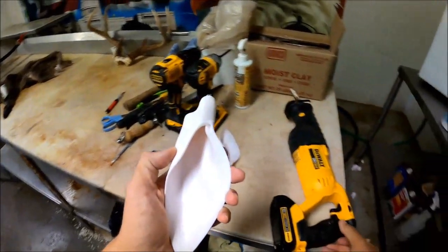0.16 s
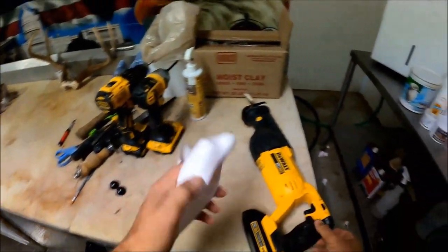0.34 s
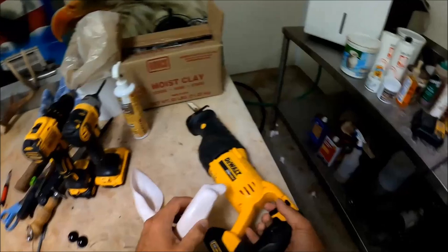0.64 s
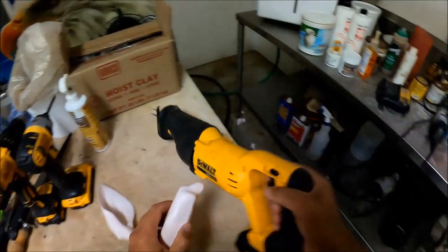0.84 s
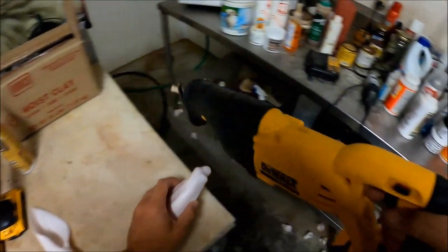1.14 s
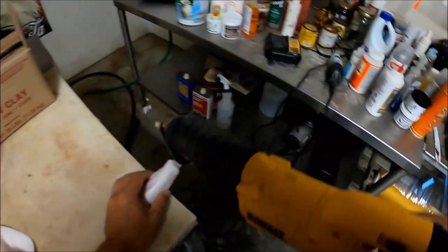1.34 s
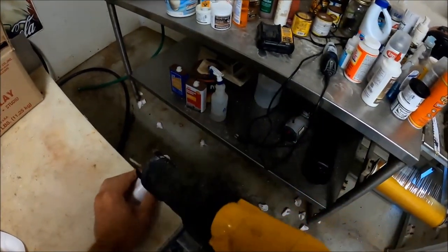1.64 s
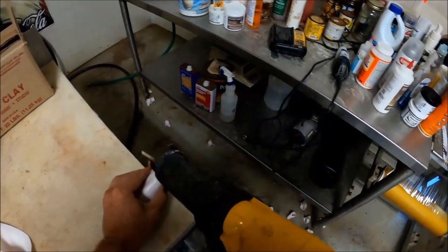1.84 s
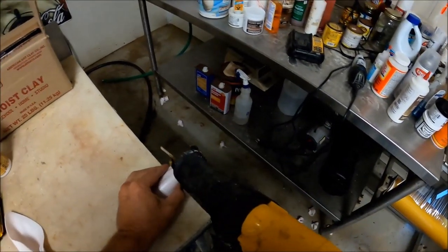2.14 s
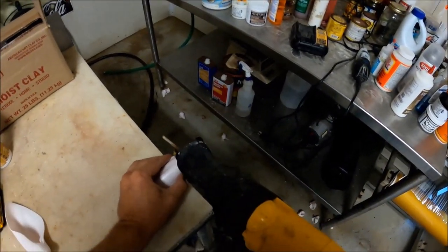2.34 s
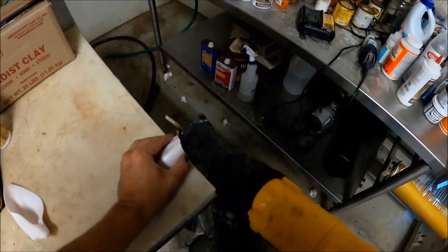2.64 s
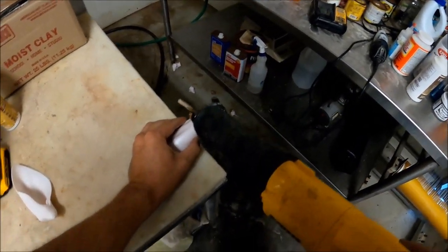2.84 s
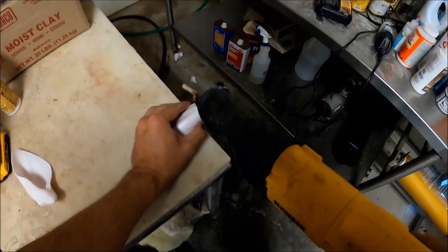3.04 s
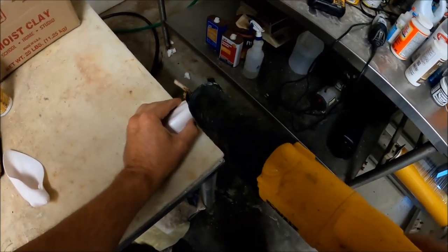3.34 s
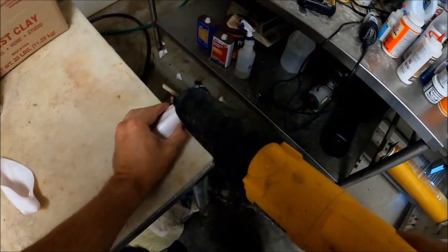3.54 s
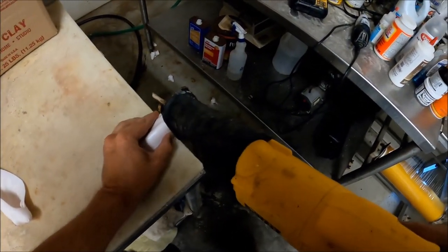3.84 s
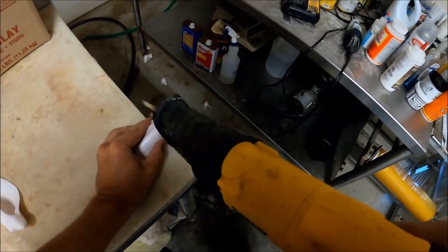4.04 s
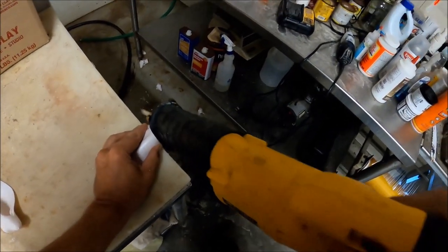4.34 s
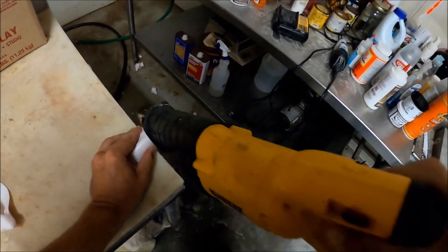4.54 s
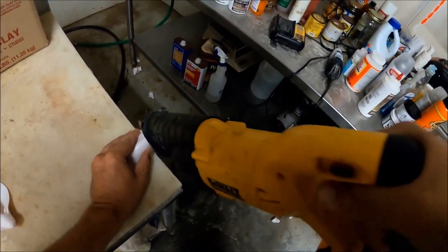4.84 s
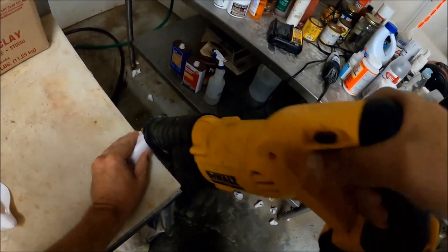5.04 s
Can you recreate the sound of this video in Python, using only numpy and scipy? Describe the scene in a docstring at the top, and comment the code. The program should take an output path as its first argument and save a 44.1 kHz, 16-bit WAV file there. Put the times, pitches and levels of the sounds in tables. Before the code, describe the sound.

In a small, quiet workshop, a cordless reciprocating saw is dragged off a bench with light scrapes, dull thuds and plastic clacks. It knocks a couple of times against a hollow plastic piece, followed by a lull with faint ticks. Then the trigger clicks and the saw runs steadily, rattling and rasping as it cuts the plastic. Heard close, from just above the tool.

```python
"""A small workshop, heard from just above a cordless reciprocating saw. The saw is dragged off the bench,
bumping the top, and its shoe is set against a plastic piece: friction hisses and impacts excite modes.
The trigger clicks and the crank runs up to about 41 strokes a second. The slide knocks several times in
each stroke, at the same crank angles; gear teeth rattle and the blade rasps, all filtered by the
resonances of the gear case, while the moving mass forces tool and bench into low vibration."""
import sys
import numpy as np
from scipy import signal
from scipy.fft import rfft, irfft
from scipy.io import wavfile
from scipy.ndimage import uniform_filter1d

SR = 44100
rng = np.random.default_rng(int(sys.argv[2]) if len(sys.argv) > 2 else 0)


def generate_wav(sig):
    """Save sig (samples, or channels by samples) to the path in sys.argv[1] as 16-bit PCM at SR."""
    pcm = np.round(np.clip(np.atleast_2d(sig).T, -1, 1) * 32767).astype(np.int16)
    wavfile.write(sys.argv[1], SR, pcm)


N = 228658
TIME = np.arange(N) / SR
HIT_SIZE = SR // 8
MOTOR_ON_S = 4.097


def saw(gear_db=-29.5, blade_db=-32, split_hz=2700):
    """Source and filter: the running saw, with gears below and blade above wavering under the load."""
    running_s = np.maximum(TIME - MOTOR_ON_S, 0)
    stroke_hz, turn = crank(running_s)
    catch = np.exp(-running_s / 0.11)  # louder while the teeth first catch
    loose = np.exp(-running_s / 0.21)  # the blade rings until the cut guides it
    gear_gain = undb(gear_db + 2.5 * catch + 0.27 * walk(18))
    blade_gain = undb(blade_db + 2 * loose + 0.5 * walk(20))
    body = gear_case(turn)
    depth = np.clip(running_s, 0, 1)  # the plastic resonates more as the cut deepens
    body = body + depth * undb(-3) * resonate(body, 3890, 340) + biting(body)
    body = body + loose * undb(0.5) * resonate(body, 4900, 860)
    gears = unit(cut(body, split_hz, "low"))
    blade = -unit(cut(body, split_hz, "high"))
    running = gears * gear_gain + blade * blade_gain + shaking(turn, stroke_hz)
    return running * np.clip(running_s / 0.006, 0, 1)


def crank(running_s, start_hz=29.18, cutting_hz=40.8, sag_hz=2.85, start_turns=.68):
    """Rotation under load: stroke rate [Hz] and angle [turns] of a crank that slows as the blade binds."""
    run_up = start_hz + 70 * running_s
    creep = cutting_hz + 1.15 * running_s
    binding = np.exp(-((TIME - 4.68) / .17) ** 2)
    stroke_hz = np.minimum(run_up, creep) - sag_hz * binding
    turn = np.cumsum(stroke_hz) / SR
    return stroke_hz, turn + (start_turns - np.interp(MOTOR_ON_S, TIME, turn)) % 1


# resonances of the gear case: (frequency [Hz], bandwidth [Hz], gain [dB])
CASE_RESONANCES = [(908, 63, -1.5), (1110, 26, -24), (1236, 120, -8), (1507, 230, -4), (1790, 40, -4),
                   (2060, 150, -5), (2530, 54, -4), (5140, 500, -3.5), (5900, 440, -0.5),
                   (12700, 1800, 2.5)]
# spectral envelope of the running saw: (frequency [Hz], gain [dB])
SAW_SPECTRUM = [(150, 1), (300, -2.5), (460, 1.5), (640, -3), (920, -3.5), (1250, -2.5), (1700, -6),
                (2750, -10.5), (3820, -8), (5000, -13), (6200, -19.5), (6900, -17), (8750, -22.5),
                (12400, -30), (15000, -50)]


def gear_case(turn, knock_db=-5.5, teeth_db=-4, rasp_db=-1.5, flicker_db=2.5):
    """Radiation from a small body: knocks, teeth and rasp excite a case too small to radiate bass."""
    rasp = undb(rasp_db) * blade_rasp(turn)
    knocks = undb(knock_db) * slide_knocks(turn)
    teeth = undb(teeth_db) * unit(two_paths(gear_teeth(turn)))
    force = knocks + teeth + rasp
    # the resonances come and go as the pressure of hand and shoe shifts
    ringing = sum(undb(db + flicker_db * walk(22)) * resonate(force, hz, width)
                  for hz, width, db in CASE_RESONANCES)
    radiated = np.array([colour(side, SAW_SPECTRUM) for side in force + ringing])
    return cut(radiated, 230, "high")


def blade_rasp(turn):
    """Sliding friction: the rasp is strongest at mid-stroke, where the blade moves fastest."""
    speed_db = 0.31 * np.cos(4 * np.pi * (turn - .2))
    return unit(diffuse(lambda: grit(2.5), apart_hz=5300) * undb(speed_db))


# knocks of the slide in each turn: (crank angle [turns], relative level [dB], brightness [Hz])
SLIDE_IMPACTS = [(.149, -2.5, 4060), (0.272, -4, 1400), (.62, -4.5, 4800), (.76, -7.5, 1600),
                 (.929, -3, 1260)]


def slide_knocks(turn, jitter_turns=.004, wander_turns=.02, scatter_db=0.97, chatter=0.7):
    """Backlash: the slide takes up its play at the same angles on each turn, and chatters briefly."""
    out = 0
    strokes = np.arange(int(turn[-1]))
    for angle, db, hz in SLIDE_IMPACTS:
        late, size = rng.standard_normal((len(strokes), 2)).T
        angles = strokes + angle + jitter_turns * late
        hits = impulses(angles, turn + wander_turns * walk(4), scatter_db * size)
        rattle = through(hits, fade(0.076)) * rng.standard_normal(N)
        blow = unit(through(hits, burst(0.005)) + chatter * np.std(hits) * unit(rattle))
        blow = unit(resonate(resonate(blow, hz, hz), hz, hz))
        out = out + two_paths(blow) * undb(db) * np.sqrt(hz)  # brighter knocks weigh more
    return unit(out)


def gear_teeth(turn, count=30, jitter=.12):
    """Gear meshing: each tooth clicks; uneven wear repeats every turn, so the whine follows the crank."""
    tooth = np.arange(int(turn[-1] * count))
    wear = rng.standard_normal(count)[tooth % count]
    late, size = rng.standard_normal((len(tooth), 2)).T
    clicks = impulses((tooth + jitter * late) / count, turn, 4 * wear + 1.2 * size)
    return unit(cut(clicks, 150, "high"))


# bites into the plastic: (time [s], half duration [s], gain [dB], frequency [Hz])
TOOTH_BITES = [(4.13, 0.026, -4, 1350), (4.192, .03, -10, 1830), (4.36, .025, -12, 1400),
               (4.502, 0.027, 2, 2000), (4.775, 0.03, -1.5, 1270), (4.925, 0.023, -2, 1190),
               (5.105, 0.02, -9, 1380)]


def biting(body, width_hz=330):
    """Transient resonance: each time the teeth bite deeper, the plastic barks at a pitch of its own."""
    return sum(undb(db) * np.exp(-((TIME - s) / length) ** 2) * resonate(body, hz, width_hz)
               for s, length, db, hz in TOOTH_BITES)


# bouncing of the shoe, near full speed and as the blade binds: (time [s], relative level [dB])
SHOE_BOUNCE = [(4.17, -40), (4.205, -27), (4.3, -31.5), (4.4, -34), (4.6, -41), (4.75, -38), (4.87, -43),
               (5.18, -44)]
# vibration of tool and bench: (harmonic of the stroke rate, relative level [dB])
STROKE_HARMONICS = [(1, -6), (2, -1.5), (3, -3.5), (4, -1.5), (6, -2), (7, -3), (8, 3.5), (11, -2.5),
                    (12, -4), (14, -3)]
# bench resonances swept by the fifth harmonic: (frequency [Hz], bandwidth [Hz], level [dB])
BENCH_DRONES = [(164.5, 30, -32), (204.6, 14, -34.5)]


def shaking(turn, stroke_hz, rumble_db=-13, chug_db=-12):
    """Forced vibration: the moving mass shakes tool and bench; its fifth harmonic drones at resonance."""
    bounce_db = np.interp(TIME, *np.transpose(SHOE_BOUNCE))
    heave = 0
    for k, db in STROKE_HARMONICS:
        # the lowest harmonics follow the bouncing shoe; the upper ones stay steadier
        level_db = db + walk(14) + (bounce_db - 5 if k <= 3 else -46)
        drift = .18 * walk(14)
        heave = heave + undb(level_db) * np.sin(2 * np.pi * (k * turn + rng.random()) + drift)
    rumble = cut(rng.standard_normal(N), 203, "low", order=4)
    rumble = unit(cut(rumble, 64, "high"))
    resonance = sum(undb(db) / (1 + (2 * (5 * stroke_hz - hz) / width) ** 2) ** 2
                    for hz, width, db in BENCH_DRONES)
    drone = resonance * np.sin(2 * np.pi * 5 * turn + .2 * walk(30))
    bounce = undb(rumble_db) * rumble + undb(chug_db) * chugging(turn)
    return heave + bounce * undb(bounce_db) + drone * undb(0.83 * walk(33))


def chugging(turn, scatter_db=4, jitter_turns=0.03):
    """Periodic impact: the shoe drops once a stroke, never equally hard, and thumps the bench top."""
    strokes = np.arange(int(turn[-1]))
    late, size = rng.standard_normal((len(strokes), 2)).T
    drops = impulses(strokes + jitter_turns * late, turn, scatter_db * size)
    thumps = through(drops, bench_top(scatter_db=1, detune=.01))
    return unit(cut(thumps, 260, "low"))


# modes of the bench top: (frequency [Hz], T60 [s], relative level [dB])
BENCH_MODES = [(111.6, 0.21, -13.5), (152.7, 0.13, -6), (195, 0.12, -4), (224.5, 0.11, -5),
               (273, 0.072, -4), (366.6, 0.045, -5), (465, 0.041, -8.5), (602, 0.018, 0), (933, 0.03, -3.5)]


def bench_top(scatter_db, detune):
    """Plate vibration: the bench top answers a blow with its damped modes."""
    return ring(BENCH_MODES, scatter_db, detune)


# modes of shoe and plastic housing: (frequency [Hz], T60 [s], relative level [dB])
HOUSING_MODES = [(515, 0.023, -9.5), (836, 0.0076, -12.5), (1064, 0.03, -2), (1335, 0.022, 4.5),
                 (1583, 0.03, -1.5), (1950, 0.0034, 3), (2290, 0.012, -6), (4080, 0.016, -14)]
# spectral envelope of a hard tick: (frequency [Hz], gain [dB])
TICK_SPECTRUM = [(300, -15), (1400, 1.5), (2300, 7), (3300, 4), (4800, 2), (6500, -5.5), (10000, -11),
                 (14000, -22.5)]
# contacts of shoe, housing and trigger:
# (time [s], relative body level [dB], relative tick level [dB], rebound delay [s])
TOOL_CONTACTS = [(0.287, -49, -70, 0.00317), (.661, -45.5, -50, 0.017), (.719, -29, -25, 0.0062),
                 (.796, -26, -35, 0.016), (.814, -30, -35, .007), (.854, -41, -39, 0.0054),
                 (.878, -28, -28.5, 0.0043), (.901, -26, -37.5, 0.012), (1.0, -33.5, -45, 0.0073),
                 (1.234, -45.5, -51, 0.0037), (1.405, -29.5, -43.5, 0.0023), (1.408, -19.5, -39, 0.0022),
                 (1.594, -42.5, -49.5, 0.0032), (1.784, -27.5, -38, 0.018), (1.81, -22.5, -30, .004),
                 (1.84, -33.5, -47, .012), (1.998, -36, -53, .003), (2.192, -51.5, -64, 0.015),
                 (2.664, -61.5, -68, .004), (2.813, -57, -66, 0.022), (3.221, -55, -54.5, .005),
                 (3.306, -52.5, -72, .003), (3.633, -54, -66, 0.008), (3.714, -56, -68, 0.0036),
                 (3.741, -54, -57.5, 0.0034), (3.767, -37, -54, 0.0056), (3.781, -37, -44, 0.0039),
                 (4.008, -34, -48, 0.015), (4.037, -46.5, -47.5, .004), (4.066, -43, -58, 0.0046),
                 (4.075, -17.5, -24, 0.0043), (4.11, -27, -39, .005)]


def clacks(crunch_gain=0.7, hollow_db=-13):
    """Impact excitation: each contact and its rebound ring the housing, crunch briefly and tick."""
    out = np.zeros((2, N))
    onset = np.clip(TIME[:HIT_SIZE] / 0.0015, 0, 1)  # the plastic gives way
    for s, body_db, tick_db, gap_s in TOOL_CONTACTS:
        edge_hz = 12000 * 2 ** ((tick_db - body_db) / 22)  # a softer contact has a duller tick
        for at, loss_db in rebounds(s, gap_s, loss_db=-5.5):
            modes = unit(ring(HOUSING_MODES, 2, .04))
            hollow = unit(resonate(burst(0.2), 416, 230))
            crunch = unit(resonate(burst(0.037), 1330, 680))
            body = modes + crunch_gain * crunch + undb(hollow_db) * hollow
            body = cut(body * onset, 2600, "low", order=3)
            body = unit(cut(body, 213, "high", order=3))
            tick = colour(burst(0.024) * onset, TICK_SPECTRUM)
            tick = unit(cut(tick, edge_hz, "low"))
            clack = undb(body_db - 18.5) * body + undb(tick_db - 15.5) * tick
            add(out, at, two_paths(undb(loss_db) * clack))
    return out


# blows of the saw on the bench: (time [s], relative level [dB], upper cutoff [Hz], lower cutoff [Hz])
BENCH_BLOWS = [(0.671, -40, 250, 60), (0.719, -14.5, 390, 60), (.779, -20, 1200, 300),
               (.789, -15.5, 523, 90), (0.877, -23, 490, 60), (.9, -24, 420, 60), (2.006, -52.5, 300, 80),
               (2.628, -57, 220, 120), (3.402, -54, 400, 99), (3.78, -45.5, 800, 200)]


def bumps(thud_db=15, softening=0.71, hard_db=-24.5):
    """Inelastic collision: the saw thuds on the bench and rebounds softly; hard clacks jolt it too."""
    out = np.zeros(N)
    blows = [(at, db + loss_db, hz * softening ** k, low_hz) for s, db, hz, low_hz in BENCH_BLOWS
             for k, (at, loss_db) in enumerate(rebounds(s, gap_s=0.036, loss_db=-8))]
    jolts = [(s, body_db - 20, 706, 100) for s, body_db, _, _ in TOOL_CONTACTS if body_db > hard_db]
    for s, db, high_hz, low_hz in blows + jolts:
        thud = bench_top(scatter_db=2.5, detune=.03) + undb(thud_db) * burst(0.09)
        thud = cut(cut(thud, high_hz, "low"), low_hz, "high")
        add(out, s, undb(db + 3) * thud / np.abs(thud).max())
    return out


# pings of the blade: (time [s], relative level [dB], frequency [Hz], tone-to-jingle ratio [dB])
BLADE_PINGS = [(0.722, -39, 5750, -2), (.909, -35, 5740, -3), (1.0, -53, 5760, -3), (1.812, -26, 3950, -19)]


def pings(t60=0.24, width_hz=650, beat_hz=50):
    """Beating: the loose blade jingles in its clamp and rings on in two closely spaced modes."""
    out = np.zeros((2, N))
    for s, db, hz, tone_db in BLADE_PINGS:
        jingle = resonate(resonate(burst(0.059), hz, width_hz), hz, width_hz)
        tone = ring([(hz, t60, 0), (hz + beat_hz, t60, -4)], 1, .001)
        ping = unit(unit(jingle) + undb(tone_db) * unit(tone))
        add(out, s, two_paths(undb(db - 20.5) * ping))
    return out


# modes of the plastic piece: (frequency [Hz], T60 [s], relative level [dB])
PIECE_MODES = [(520, 0.31, -12), (958, 0.23, -9.5), (1145, 0.1, 4.5), (1243, 0.053, -2.5), (1600, .12, -14)]


def piece_knock(at_s=1.409, level_db=-44):
    """Free vibration: the hollow plastic piece rings when the saw first knocks against it."""
    out = np.zeros((2, N))
    add(out, at_s, two_paths(undb(level_db) * unit(ring(PIECE_MODES, 1, 0.0046))))
    return out


# spectral envelope of sliding plastic: (frequency [Hz], gain [dB])
FRICTION_SPECTRUM = [(88, -17), (150, -6.5), (228, 0), (270, -12), (380, -5), (893, -9), (1770, -4.5),
                     (2590, -10.5), (4320, -12.5), (6300, -23.5), (9000, -29), (14000, -46)]
# scrapes: (time of peak pressure [s], relative level [dB], swell time [s], decay time [s])
SCRAPE_SWELLS = [(.23, -59.5, 0.06, 0.34), (0.401, -45, 0.048, 0.067), (.62, -61.5, 0.14, .08),
                 (0.721, -50.5, 0.054, 0.15), (.87, -45.5, 0.1, 0.065), (1.15, -61.5, 0.055, 0.043),
                 (1.399, -47, 0.022, 0.04), (1.805, -40, 0.016, 0.064), (2.85, -72, .03, 0.062),
                 (3.77, -55, 0.027, 0.012)]


def sliding(shell_db=5):
    """Friction noise: plastic rubs over bench, hand and workpiece; hard pressure rings the shell."""
    pressure = 0
    for s, db, swell, decay in SCRAPE_SWELLS:
        falloff = np.where(TIME < s, ((TIME - s) / swell) ** 2, (TIME - s) / decay)
        pressure = pressure + undb(db) * np.exp(-falloff.clip(0, 20))
    friction = diffuse(lambda: colour(grit(1.5), FRICTION_SPECTRUM), apart_hz=3000)
    friction = unit(friction * undb(1.7 * walk(90)))
    shell = undb(shell_db) * pressure / pressure.max() * resonate(friction, 2050, 1000)
    return pressure * (friction + shell) * undb(-2.5)


def workshop(x, near_db=-12, walls_db=-8, balance_db=1.32):
    """Reverberation: direct sound, early reflections off bench and body, then the walls."""
    size = SR // 2
    near = diffuse(lambda: burst(0.092, size), apart_hz=3030)
    near = np.roll(near, SR // 1000, axis=1)
    build_up = np.clip(TIME[:size] / .015, 0, 1)
    walls = diffuse(lambda: burst(.52, size) * build_up, apart_hz=1100)
    walls = cut(walls, 7000, "low", order=1)
    response = cut(undb(near_db) * near + undb(walls_db) * walls, 94, "high", order=1)
    x = x + 0.14 * cut(x, 2500, "high", order=1) * np.array([[-1], [1]])  # treble leans right
    x = x * undb(np.array([[balance_db], [-balance_db]]) / 2)  # bass leans left
    direct = np.array([np.append(0, x[0][:-1]), x[1]])  # arrives first on the right
    reflected = np.array([through(side, echo) for side, echo in zip(x, response)])
    return (direct + reflected) * undb(-0.49)


# spectral envelope of the still air: (frequency [Hz], gain [dB])
AIR_SPECTRUM = [(15, -37), (25, -11.5), (82, -14), (113, -22), (213, -5.5), (237, -8), (330, -9),
                (436, -16), (472, -13), (511, -23.5), (750, -22.5), (1300, -26), (1640, -20.5), (1900, -26),
                (2300, -25.5), (2860, -35.5), (14000, -34.5)]
# tones of the room's hum: (frequency [Hz], level [dB])
HUM_TONES = [(215, -74), (474, -76)]


def air(noise_db=-65):
    """Ambient noise: a quiet diffuse field with a faint wavering hum."""
    noise = diffuse(lambda: rng.standard_normal(N), apart_hz=1100)
    noise = cut(noise, 7040, "low", order=3)
    noise = unit(np.array([colour(side, AIR_SPECTRUM) for side in noise]))
    hum = sum(undb(db + 2 * walk(3.88)) * np.sin(2 * np.pi * hz * TIME + 0.53 * walk(3.1))
              for hz, db in HUM_TONES)
    return noise * undb(noise_db + walk(46)) + hum


def two_paths(x):
    """Multipath: a source reaches two close points alike in the bass, differently in the treble."""
    side = cut(through(x, burst(.012)[:512]), 4300, "high")
    return x + undb(-3) * side * np.array([[1], [-1]])


def diffuse(make, apart_hz):
    """Spatial coherence: a diffuse field at two close points is alike only in the bass."""
    return make() + cut(make(), apart_hz, "high", order=1) * np.array([[1], [-1]])


def ring(modes, scatter_db, detune):
    """Modal superposition: each point of contact weights the damped modes differently."""
    out = 0
    for hz, t60, db in modes:
        gain = undb(db + scatter_db * rng.standard_normal()) * rng.choice([-1, 1])
        hz = hz * (1 + detune * rng.standard_normal())
        out = out + gain * fade(t60, HIT_SIZE) * np.sin(2 * np.pi * hz * TIME[:HIT_SIZE])
    return out


def rebounds(s, gap_s, loss_db):
    """Restitution: a contact and its weaker rebound, as (time [s], gain [dB])."""
    return [(s, 0), (s + abs(gap_s), loss_db)]


def impulses(angles, turn, db):
    """Impulse train: one pulse as the crank passes each angle."""
    at = np.interp(angles, turn, np.arange(N)).astype(int)
    return np.bincount(at, undb(db), N)


def grit(spread_db):
    """Stick-slip friction: noise made of tiny catches of unequal size."""
    return unit(rng.standard_normal(N) * undb(spread_db * walk(1500)))


def burst(t60, size=HIT_SIZE):
    """Damped noise of energy 1."""
    x = rng.standard_normal(size) * fade(t60, size)
    return x / np.sqrt(np.sum(x ** 2))


def fade(t60, size=SR // 2):
    """Exponential decay, 60 dB in t60 seconds."""
    return np.exp(-np.log(1000) * np.minimum(TIME[:size] / t60, 10))


def walk(rate_hz):
    """Smooth random modulation of rms 1."""
    k = int(SR / rate_hz)
    steps = np.repeat(rng.standard_normal(N // k + 1), k)
    return unit(uniform_filter1d(steps, k)[:N])


def colour(x, points):
    """Minimum-phase filter through (frequency [Hz], gain [dB]) points."""
    hz, db = np.transpose(points)
    grid = np.fft.rfftfreq(2048, 1 / SR)
    gain = undb(np.interp(np.log(grid + 1), np.log(hz), db))
    cepstrum = irfft(np.log(gain))
    fold = 1 + np.sign(np.fft.fftfreq(len(cepstrum)))
    return through(x, irfft(np.exp(rfft(cepstrum * fold))))


def resonate(x, hz, width_hz):
    """Second-order resonance, gain 1 at its centre."""
    return signal.lfilter(*signal.iirpeak(hz, hz / min(width_hz, SR / 4), fs=SR), x)


def cut(x, hz, kind, order=2):
    """Maximally flat low-pass or high-pass."""
    return signal.sosfilt(signal.butter(order, min(hz, SR / 2 - 1), kind, fs=SR, output="sos"), x)


def through(x, response):
    """Convolution with an impulse response."""
    return signal.oaconvolve(x, response)[:len(x)]


def add(track, s, sound):
    """Superpose a sound at s seconds."""
    i = int(np.clip(s * SR, 0, N))
    track[..., i:i + sound.shape[-1]] += sound[..., :N - i]


def undb(db):
    """Decibels to amplitude ratio."""
    return 10 ** (np.asarray(db) / 20)


def unit(x):
    """Normalise to rms 1."""
    return x / np.sqrt(np.mean(x ** 2))


def scene():
    """Superposition: sawing and handling sound in the room, over its ambient noise."""
    return workshop(saw() + bumps() + clacks() + pings() + piece_knock() + sliding()) + air()


def record(dry):
    """Band limiting: a steep low-pass removes the highest treble."""
    return signal.sosfilt(signal.ellip(8, .2, 70, 14600, fs=SR, output="sos"), dry)


dry = scene()
out = record(dry)
generate_wav(out)
```